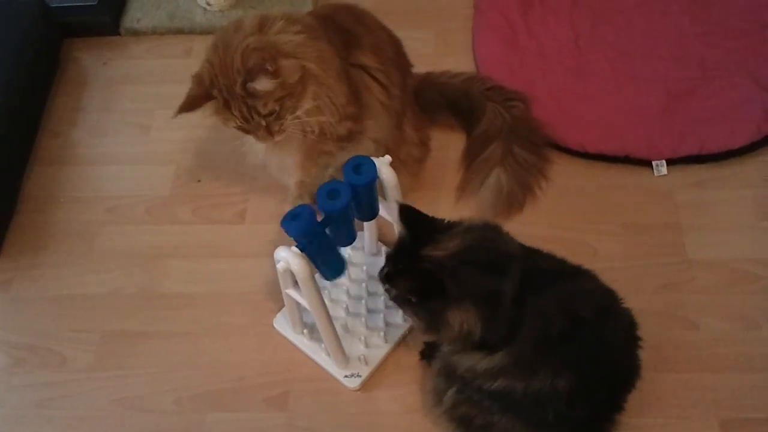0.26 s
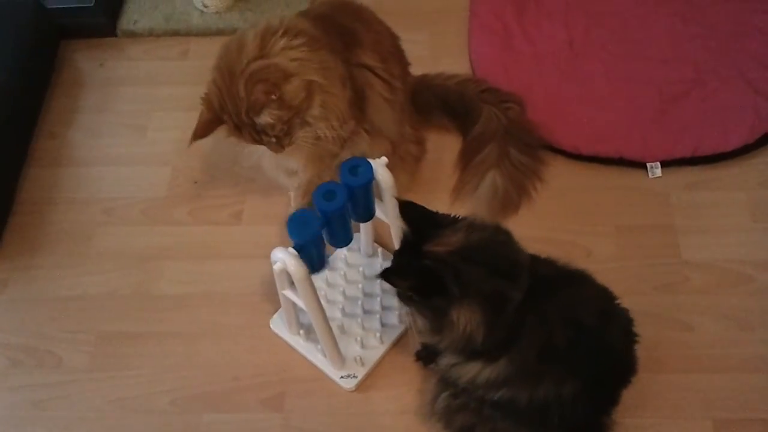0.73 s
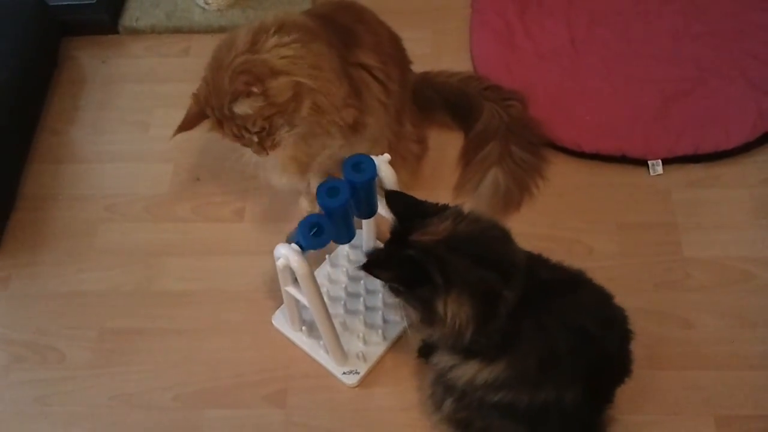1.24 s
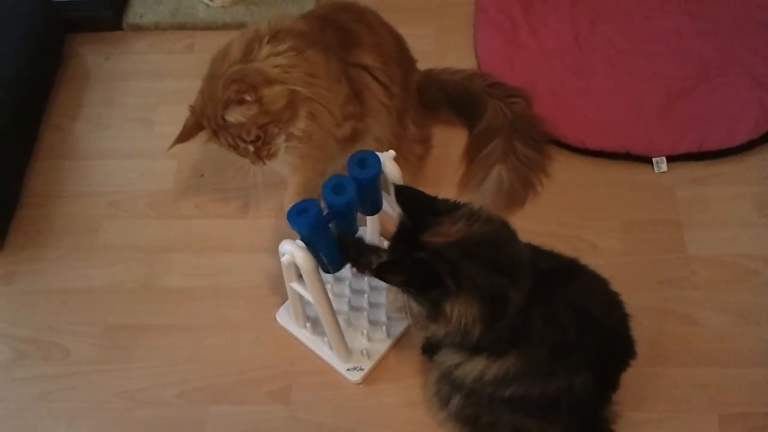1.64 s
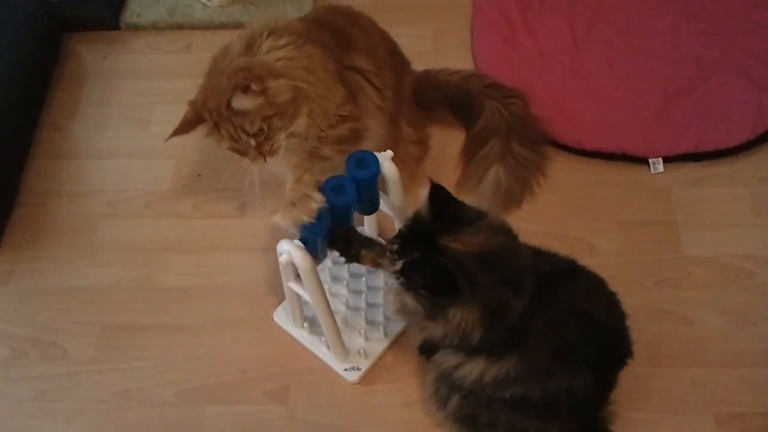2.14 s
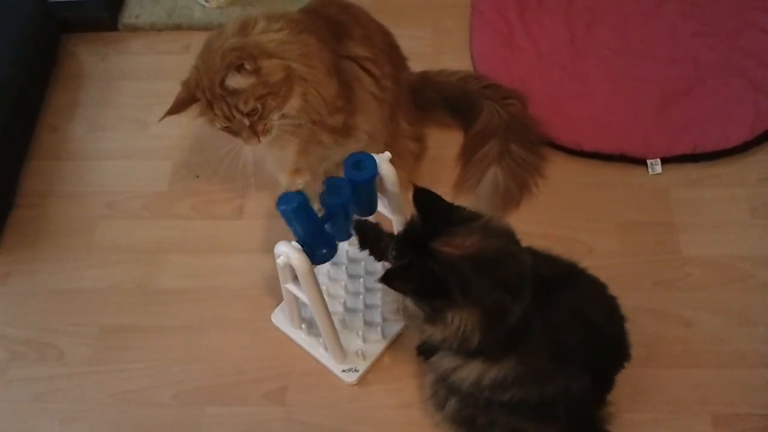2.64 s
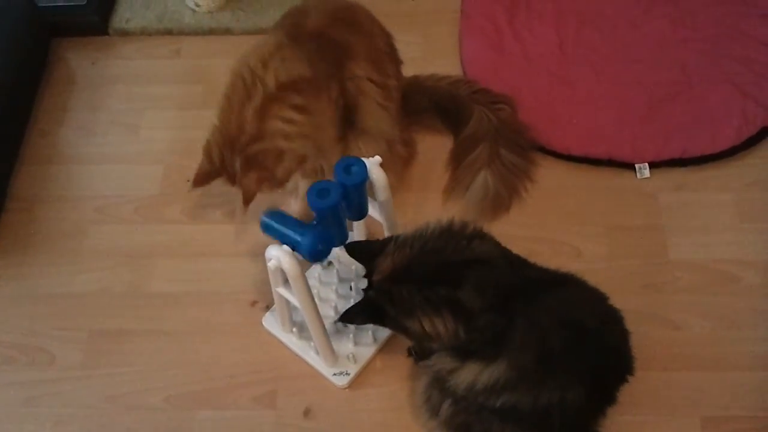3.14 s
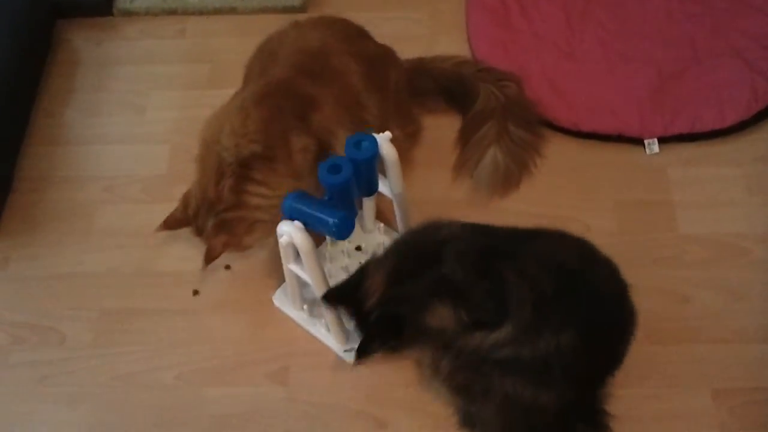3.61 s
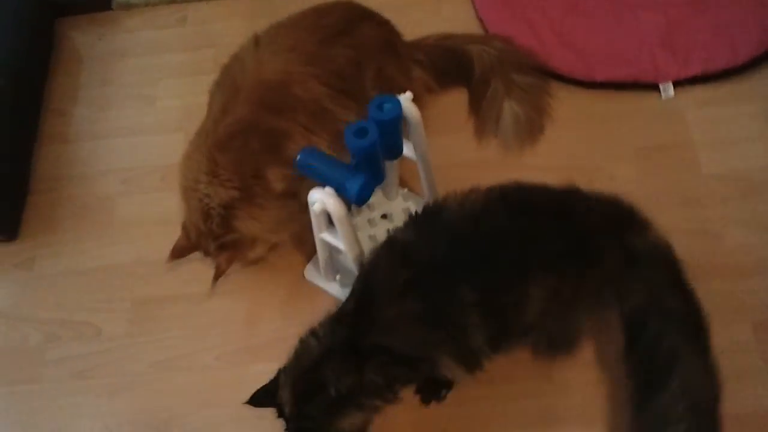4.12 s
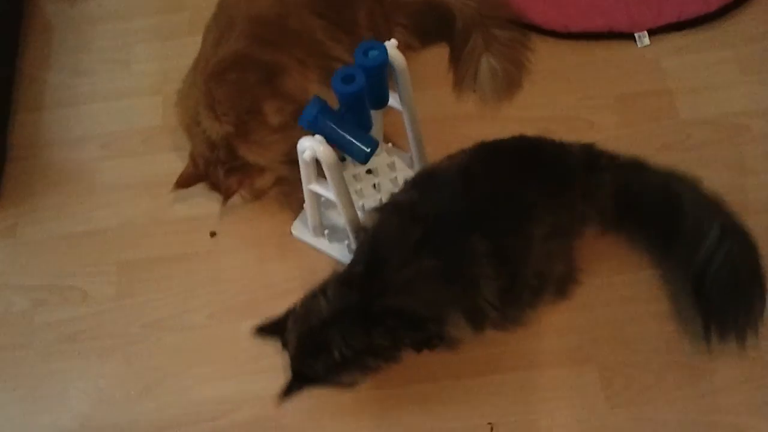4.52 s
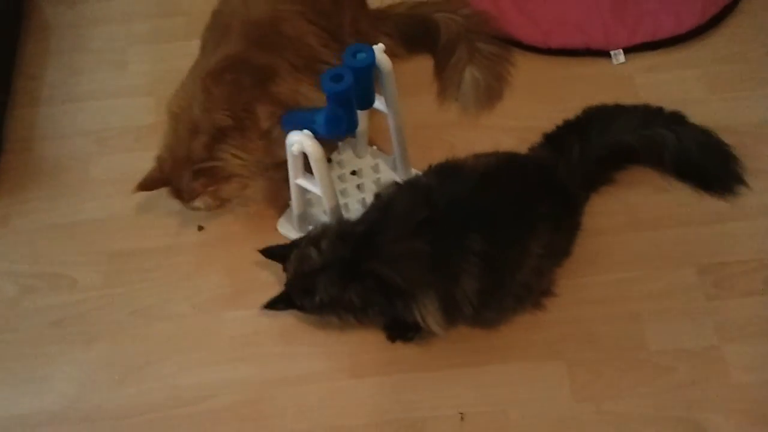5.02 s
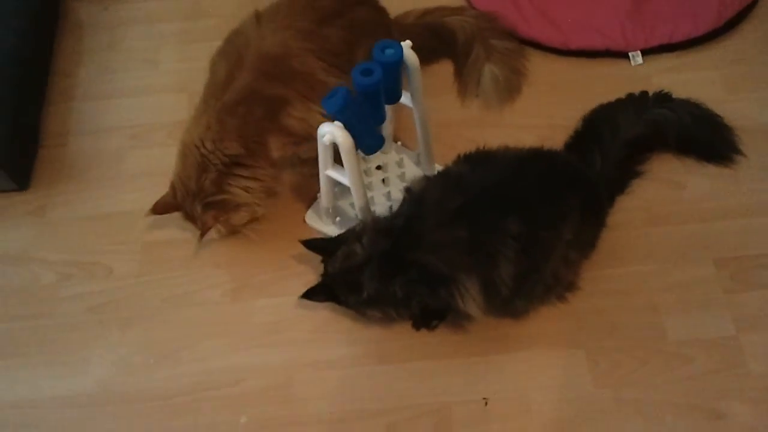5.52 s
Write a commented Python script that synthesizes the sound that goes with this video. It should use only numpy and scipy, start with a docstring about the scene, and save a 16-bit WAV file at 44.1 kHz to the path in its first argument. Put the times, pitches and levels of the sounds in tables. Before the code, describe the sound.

Over a low wavering hum and soft hiss, dry treats click and rattle brightly in plastic tubes within the first second. Sparse taps and dull knocks follow, then a louder clatter around three seconds as treats spill onto a tray. A last brief burst comes after four seconds, then two barely audible squeaks and a few ticks. Small wooden-floored room, one microphone, dulled top treble.

```python
"""A low hum and hiss come first; soon dry treats click and rattle in plastic tubes that two cats paw at,
tubes that swing on a stand. The treats spill onto a tray, blows knock the stand and thud into the wooden
floor, and two faint squeaks follow. Solids ring as sums of decaying sine modes, tumbling treats are random
impacts through resonators, and a small room adds brief, dense reflections. A slow gain control turns
the sum down when it is loud, and the treble is cut."""
import sys
import numpy as np
from scipy import signal
from scipy.fft import rfft, irfft
from scipy.io import wavfile
from scipy.ndimage import uniform_filter1d

SR = 44100
rng = np.random.default_rng(int(sys.argv[2]) if len(sys.argv) > 2 else 0)


def to_wav(s):
    """Save 16-bit WAV."""
    ch = np.atleast_2d(s).T  # columns
    pcm = np.round(np.clip(ch, -1, 1) * 32767)  # PCM
    wavfile.write(sys.argv[1], SR, pcm.astype(np.int16))


N = 254162

# Spectral shape of the hiss. Each row: frequency in Hz, relative density in dB.
HISS_SPECTRUM = [(25, 5), (45, 1.5), (100, 1.5), (200, -0.5), (500, -6), (700, -7), (1100, -9.5),
                 (1500, -11.5), (3000, -15), (5000, -16), (6800, -17), (8000, -16), (8600, -34.5)]
# Course of the low hum. Each row: time in seconds, level in dB before the hum's fixed trim.
HUM_LEVEL = [(0.1, -64), (0.7, -56.5), (1.2, -62.5), (1.41, -63.5), (1.47, -50), (1.69, -60), (1.78, -60),
             (1.94, -50.5), (2.15, -62.5), (2.27, -53), (2.57, -52), (2.65, -45.5), (2.74, -49.5),
             (2.87, -47), (3.1, -58), (4.1, -61), (5.1, -69.5), (5.65, -61.5)]
# Tones of the hum. Each row: centre frequency in Hz, scale of the pitch wander in Hz, relative level in dB.
HUM_TONES = [(74.5, 4.74, -5), (93.2, 6, -6.5)]
# Treats striking plastic. Each row: start in seconds, peak of the tube sound in dB, focus frequency in Hz,
# spread in octaves, tray peak in dB relative to the level of the tube.
CLICKS = [(0.093, -48.5, 4640, 0.7, -8), (0.3323, -33.5, 7340, 0.64, -28), (0.3426, -35, 7290, 0.43, -18),
          (0.4404, -23.5, 7930, 0.7, -32), (0.5432, -31, 4520, 0.43, -43), (0.578, -32, 4600, 0.66, -34),
          (0.609, -22.5, 4700, 0.37, -48), (0.6136, -19, 5340, 0.22, -27), (0.6375, -19, 6900, 0.59, -22),
          (0.6454, -30, 7220, .35, -9), (0.665, -30, 7200, 0.23, -26), (0.6912, -22.5, 5150, .24, -24),
          (0.6998, -40, 6940, 0.54, -32), (0.7135, -37, 7320, .25, -20), (0.7259, -34, 5570, .4, -12),
          (0.7602, -31.5, 4420, .23, -27), (1.1262, -47, 4340, 0.34, -18), (1.143, -46, 4100, .3, -25),
          (1.18, -44, 4500, .26, -32), (1.2305, -30.5, 4130, 0.7, -10), (1.2742, -41.5, 7470, .4, -11),
          (1.296, -38, 7890, 0.7, -12), (1.4966, -43, 5250, 0.19, -33), (1.507, -44.5, 4730, 0.21, -39),
          (2.151, -44.5, 3570, .4, 0), (2.422, -51.5, 5700, 0.31, -13), (2.5317, -33, 5040, 0.67, -21),
          (2.8062, -40, 5780, .5, -1), (2.812, -33, 5830, 0.37, -2.5), (2.8312, -24.5, 7280, 0.63, -19),
          (2.8496, -7, 5900, .23, -53), (2.8694, -44, 5900, .4, -35), (2.917, -22, 5670, 0.2, -32),
          (2.928, -22.5, 5530, .31, -13.5), (2.9505, -16.5, 6000, 0.44, -41),
          (2.9602, -33.5, 5560, .54, -8.5), (2.9804, -17, 6100, 0.29, -29), (3.1183, -16, 6230, 0.6, -8.5),
          (3.224, -40, 6700, 0.35, 8), (3.2681, -26.5, 7000, .5, -27), (3.2797, -19.5, 7040, 0.58, -9),
          (3.3104, -32.5, 6850, .4, 0.5), (3.3563, -15.5, 5710, 0.1, -12.5), (3.3807, -28, 6670, 0.31, -26),
          (3.444, -27.5, 6930, 0.66, -8), (3.4849, -27, 6400, .4, -22), (3.493, -24.5, 4600, .42, -14),
          (3.5064, -33.5, 6320, .35, -29), (3.591, -36, 4640, .44, -5), (3.604, -28.5, 7600, 0.45, -8.5),
          (3.66, -48, 4430, .4, -20), (3.701, -34, 6670, 0.44, -15), (3.8387, -49, 4800, .54, -2),
          (3.937, -45, 5400, 0.38, -16), (3.994, -45.5, 3610, 0.37, -6), (4.146, -26.5, 5800, 0.6, -21),
          (4.1835, -16.5, 7100, 0.58, -25), (4.1932, -38.5, 7030, .4, -24),
          (4.2553, -29.5, 4600, 0.65, -41), (4.2961, -27.5, 7340, 0.7, -16.5),
          (4.356, -43.5, 4500, .3, -4.5), (4.4344, -48, 7240, .37, -7), (4.4444, -44, 4790, .43, -12),
          (5.186, -36, 4450, 0.29, -36), (5.1921, -38, 4460, .3, -39), (5.249, -39.5, 7120, 0.67, -16),
          (5.258, -47, 7300, 0.64, -11)]
# Showers of tumbling treats. Each row: start in seconds, level in dB before mode weights,
# 60 dB decay time in seconds, share of tray and stand in dB.
SHOWERS = [(0.331, -51.5, 0.86, -5.5), (0.439, -57.5, 0.67, -0.5), (0.543, -58, 0.3, -0.5),
           (0.612, -40, 0.38, -14), (.66, -38, 0.27, -11), (1.23, -56.5, 0.39, 9.5), (1.496, -65, 0.1, -19),
           (2.151, -59, 0.27, 10.5), (2.532, -65, 0.67, 7.5), (2.806, -49, 0.58, -3.5),
           (2.851, -43, 0.57, -4.5), (2.947, -45.5, 0.57, -2), (2.981, -40, 0.14, -5),
           (3.117, -34.5, 0.25, -6), (3.224, -46.5, 0.98, 3.5), (3.269, -37.5, 0.51, -4.5),
           (3.355, -42.5, 0.83, -0.5), (3.487, -42.5, 0.41, -5), (3.588, -49, 0.99, -4),
           (3.937, -57, 0.32, -6), (4.148, -48.5, 0.41, -8.5), (4.184, -40, 0.18, -13),
           (4.256, -55, 0.22, -15), (4.83, -66.5, .95, -2), (5.249, -52, 0.15, -15)]
# Paws and tubes knocking the stand. Each row: start in seconds, stand peak in dB, focus frequency in Hz,
# ring length factor, floor thud, tray share and room share in dB.
KNOCKS = [(1.22, -43, 710, 1.4, -14, -24, 0), (1.233, -31, 963, 1.1, -14, -14.5, 3),
          (2.154, -31.5, 805, 0.56, -11, -18, -0.5), (2.549, -47.5, 663, 1.5, -30, -20, 4.5),
          (2.813, -46.5, 1160, 1.6, -19, -6, 3), (2.85, -40, 653, 1.7, -22, -25, 3.5),
          (2.927, -31, 670, 1.2, -11, -17, -0.5), (3.033, -39, 660, 1, -26, -28, -2),
          (3.119, -32.5, 1240, 2.86, -15.5, -2, -1.5), (3.224, -28, 864, .45, -27, -3, -15),
          (3.269, -42, 620, .52, -0.5, -13, -10), (3.308, -35.5, 930, 1.4, -15, -12, -15),
          (3.357, -34.5, 795, 0.89, -25, -14, -19), (3.483, -39.5, 870, 0.77, -14.5, -7, 3),
          (3.584, -47.5, 810, 2.4, -16, -4, 2), (4.182, -49, 694, 1.05, -2, -15, -4)]
# Thin squeaks, perhaps a tube turning on its rod. Each row: start in seconds, end in seconds,
# mean frequency in Hz, mean level in dB.
SQUEAKS = [(4.46, 4.64, 2320, -66.5), (4.58, 4.75, 2690, -66.5)]
# Modes of the four bodies. Each row: frequency in Hz, relative level in dB, nominal 60 dB decay in seconds.
TUBE_MODES = [(3773, 0, 0.052), (4410, 3, 0.021), (4400, 0, 0.021), (4730, 4.5, 0.026), (5446, -9, 0.07),
              (5650, 1.5, 0.028), (5710, 0, 0.013), (6050, -4, 0.022), (6795, 3, 0.021), (7135, 5, 0.029),
              (7350, -2, 0.035), (7620, 1, 0.039)]
TRAY_MODES = [(1635, -4.5, .03), (1890, -1, 0.041), (2090, -2.5, .03), (2217, -9, 0.083),
              (2330, -7.5, 0.052), (2498, -1.5, 0.039), (2815, -3.5, 0.053), (3294, -2, 0.051)]
STAND_MODES = [(669.5, -1.5, 0.066), (780, -3.5, 0.055), (883, -2.5, 0.053), (962, 2, 0.02),
               (1157, -1, 0.086), (1224, -6.5, 0.059)]
FLOOR_MODES = [(157, -3, 0.053), (218, -4.5, 0.21), (303.4, 6, 0.05), (387, 1.5, 0.086)]

HISS_DB = -58
MAINS_HZ, MAINS_DB = 120, -67
TICK_S = .0003  # contact time of a dry treat
CRACK_LENGTH, CLICK_RING = .17, 0.61  # ring length factors: first crack, then the ring
CLICK_ROOM_DB = -3.5  # share sent to the room by a click of -26.5 dB
NEARNESS = 0.14  # louder clicks land nearer: dB less room share per dB of level
TRAY_HZ, TRAY_RISE_HZ_PER_DB = 2350, 30  # tray focus at -29.5 dB; harder hits reach higher modes
GRAIN_SPREAD_DB = 0.5  # size scatter of tumbling treats
SHOWER_HZ, SHOWER_STAND_DB = 5600, -2.5  # tube focus; stand share relative to tray share
KNOCK_TRAY_HZ = 2270  # focus of the tray as it shakes along
KNOCK_SPREAD = .2  # octaves
ROOM_T60_S, ROOM_DB = 0.3, 0
OFFSET = -0.038  # steady converter offset, before the gain control
TOP_HZ = 8950  # edge of the final cut


def undb(db):
    """Logarithmic measure: dB to amplitude gain."""
    return 10 ** (np.asarray(db) / 20)


def level(x, db):
    """Mean-square power: scale a signal to an rms level in dB."""
    return x * undb(db) / np.sqrt(np.mean(x ** 2))


def walk(rate):
    """Smoothed random process: normal values held 1 / rate s, then averaged twice over that time."""
    k = int(SR / rate)
    held = np.repeat(rng.standard_normal(N // k + 1), k)
    return uniform_filter1d(uniform_filter1d(held, k), k)[:N]


def band(x, hz, width):
    """Second-order resonance: pass a band of the given width in Hz."""
    return signal.lfilter(*signal.iirpeak(hz, hz / width, fs=SR), x)


def ring(modes, focus_hz, octaves, chance, damp, contact_s):
    """Modal superposition: one blow of peak 1 excites decaying sines, favouring those near the focus."""
    hz, db, t60 = np.transpose(modes)[:, :, None]
    t = np.arange(int(damp * t60.max() * SR)) / SR
    distance = np.log2(hz / focus_hz) / max(octaves, .1)
    gain = undb(db - 4.8 * distance ** 2)
    # Each blow gives every mode its own strength and a slight detuning.
    gain = gain * undb(1.5 * chance[:len(modes), None])
    hz = hz * (1 + .01 * chance[-len(modes):, None])
    decay = np.exp(-np.log(1000) * t / (damp * t60))
    y = np.sum(gain * decay * np.sin(2 * np.pi * hz * t), axis=0)
    # The push swells in over the contact time.
    y = y * np.sin(np.pi / 2 * np.minimum(t / contact_s, 1)) ** 2
    return y / np.abs(y).max()


def add(out, s, y):
    """Linear superposition: mix y into out from second s."""
    i = int(s * SR)
    out[i:i + len(y)] += y[:len(out) - i]


def hiss():
    """Shaped random noise: room air and microphone noise, wavering a little in level."""
    hz, db = np.transpose(HISS_SPECTRUM)
    f = np.maximum(np.arange(N // 2 + 1) * SR / N, 1)
    shape = undb(np.interp(np.log(f), np.log(hz), db)) * (f > 20)
    noise = irfft(rfft(rng.standard_normal(N)) * shape, N)
    return level(noise, HISS_DB) * undb(0.4 * walk(2.95))


def hum():
    """Slow frequency and amplitude modulation: two low tones wander and swell beside a mains line."""
    t = np.arange(N) / SR
    rumble = 0
    for hz, wander, db in HUM_TONES:
        swell = undb(db + 3.7 * walk(12) + 3 * walk(4.99))
        phase = 2 * np.pi * np.cumsum(hz + wander * walk(7.8)) / SR
        rumble = rumble + swell * np.sin(phase)
    mains = undb(MAINS_DB + 2.2 * walk(3.27)) * np.sin(2 * np.pi * MAINS_HZ * t)
    course = undb(np.interp(t, *np.transpose(HUM_LEVEL)))
    return level(rumble, -1.4) * course + mains


def clicks():
    """Impact excitation: each treat rings tube and tray; gives direct sound and five spots' room feeds."""
    near, far = np.zeros(N), np.zeros((5, N))
    # Small walls radiate no bass.
    thin = signal.butter(N=6, Wn=3550, btype="high", fs=SR, output="sos")
    chances = rng.standard_normal((len(CLICKS), 24))
    for k, ((s, db, hz, octaves, tray_db), chance) in enumerate(zip(CLICKS, chances)):
        y = np.zeros(SR // 5)
        # The first instant shakes a wider range of modes.
        add(y, 0, ring(TUBE_MODES, hz, 2 * octaves, chance, CRACK_LENGTH, TICK_S))
        add(y, 0, undb(6.5) * ring(TUBE_MODES, hz, octaves, chance, CLICK_RING, TICK_S))
        y = signal.sosfilt(thin, y)
        y = undb(db) * y / np.abs(y).max()
        tray_hz = TRAY_HZ + TRAY_RISE_HZ_PER_DB * (db + 29.5)
        tray = ring(TRAY_MODES, tray_hz, 0.33, chance, CLICK_RING, contact_s=0.00052)
        add(y, 0, undb(db + tray_db) * tray)
        add(near, s, y)
        room_db = CLICK_ROOM_DB - NEARNESS * (db + 26.5)
        add(far[k % len(far)], s, y * undb(room_db))
    return near, far


def room(x):
    """Diffuse reverberation: delayed, decaying random reflections, with one pattern per spot (row)."""
    t = np.arange(SR // 2) / SR
    decay = np.exp(-np.log(1000) * t / ROOM_T60_S)
    onset = np.clip(t / 0.006 - .3, 0, 1)  # silent for 1.8 ms, full at 7.8 ms
    tail = rng.standard_normal((len(x), len(t))) * decay * onset
    tail = tail / np.sqrt(np.sum(tail ** 2, axis=1, keepdims=True))
    return signal.fftconvolve(x, tail, axes=1)[:, :N].sum(axis=0) * undb(ROOM_DB)


def tumble(hz, t60, rate, spread_db):
    """Random impacts through a resonator: uneven hits, rate per second on average, ring one mode; rms 1."""
    hits = (rng.random(N) < rate / SR) * 1.
    sizes = np.minimum(rng.exponential(size=int(hits.sum())), 2.5)
    hits[hits > 0] = undb(spread_db * sizes)
    mode = band(hits, hz, 23.0 / t60)
    return level(band(mode, hz, hz / 4), 0)


def rattle():
    """Addition of powers: showers start at once and decay, bright in the tubes, dull in tray and stand."""
    t = np.arange(SR // 2) / SR
    out = 0
    for body, modes in ("tube", TUBE_MODES), ("tray", TRAY_MODES), ("stand", STAND_MODES):
        for hz, db, t60 in modes:
            power = np.zeros(N)
            for s, shower_db, shower_t60, body_db in SHOWERS:
                if body == "tube":
                    share_db = -6 * (np.log2(hz / SHOWER_HZ) / 1.6) ** 2
                elif body == "tray":
                    share_db = body_db
                else:
                    share_db = body_db + SHOWER_STAND_DB
                # Twice the dB and twice the decay rate turn amplitude into power.
                decay = np.exp(-2 * np.log(1000) * t / shower_t60)
                add(power, s, undb(2 * (shower_db + share_db)) * decay)
            grains = tumble(hz, t60, 110, GRAIN_SPREAD_DB)
            out = out + undb(db - 9.0) * np.sqrt(power) * grains
    return out


def knocks():
    """Longer contact excites duller modes: soft blows ring the hollow stand and tray and thud in the floor."""
    near, far = np.zeros(N), np.zeros(N)
    chances = rng.standard_normal((len(KNOCKS), 24))
    for (s, db, hz, length, thud_db, tray_db, room_db), chance in zip(KNOCKS, chances):
        damp = np.clip(length, .2, 4)
        y = np.zeros(SR // 2)
        stand = ring(STAND_MODES, hz, KNOCK_SPREAD, chance, damp, contact_s=0.0017)
        add(y, 0, undb(db) * stand)
        tray = ring(TRAY_MODES, KNOCK_TRAY_HZ, 0.13, chance, damp, contact_s=0.0012)
        add(y, 0, undb(db + tray_db) * tray)
        add(near, s, y)
        thud = ring(FLOOR_MODES, 250, 0.96, chance, 1.7, contact_s=0.0056)
        add(near, s, undb(db + thud_db) * thud)
        add(far, s, y * undb(room_db))
    return near, far


def squeak():
    """Random frequency and amplitude modulation: two faint tones waver in pitch and strength."""
    t, out = np.arange(N) / SR, 0
    for start, end, hz, db in SQUEAKS:
        progress = np.clip((t - start) / (end - start), 0, 1)
        shape = np.sqrt(np.sin(np.pi * progress).clip(0))
        tone = np.sin(2 * np.pi * np.cumsum(hz * (1 + .012 * walk(90))) / SR)
        out = out + shape * undb(db + 4 * walk(50)) * tone
    return out


def scene():
    """Superposition: direct sounds, their reflections and the background add linearly."""
    click, click_far = clicks()
    knock, knock_far = knocks()
    loose = rattle()
    dull_far = undb(-3.5) * knock_far + undb(-8.0) * loose
    wet = room(np.vstack([click_far, dull_far]))
    return (click + knock + loose + wet + squeak() + hum() + hiss())[None]


def record(dry):
    """Compression and band limiting: slow gain falls with mean power, offset included; treble is cut."""
    rate = 1 / (.3 * SR)  # averaging over about 0.3 s
    loud = signal.lfilter([rate], [1, rate - 1], dry ** 2)
    gain = (1 + loud / undb(-64)) ** -.5  # 3 dB down at -32 dB rms, as loud is a power
    rolloff = signal.butter(N=12, Wn=8300, fs=SR, output="sos")
    cut = signal.ellip(8, .2, 60, TOP_HZ, fs=SR, output="sos")
    soft = signal.sosfilt(rolloff, dry * gain)
    return OFFSET * gain + signal.sosfilt(cut, soft)


dry = scene()
out = record(dry)
to_wav(out)
```